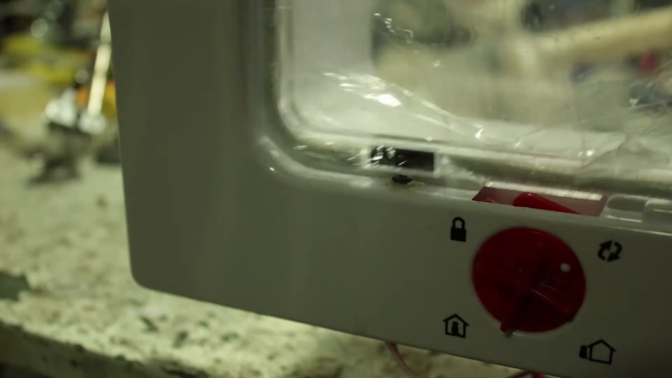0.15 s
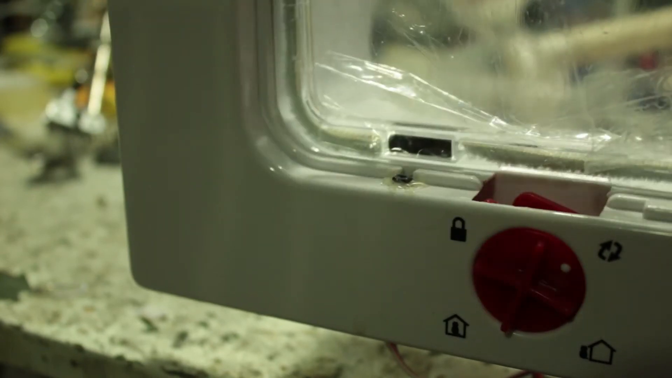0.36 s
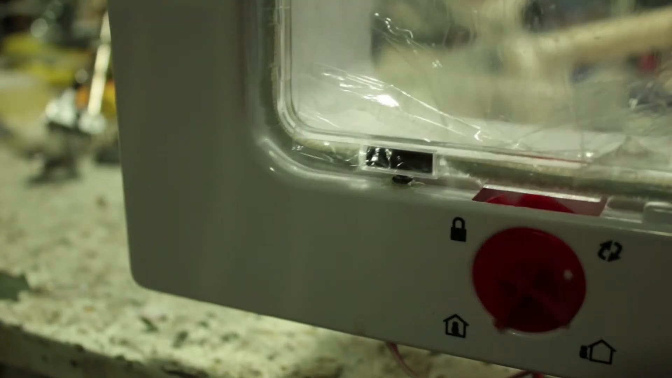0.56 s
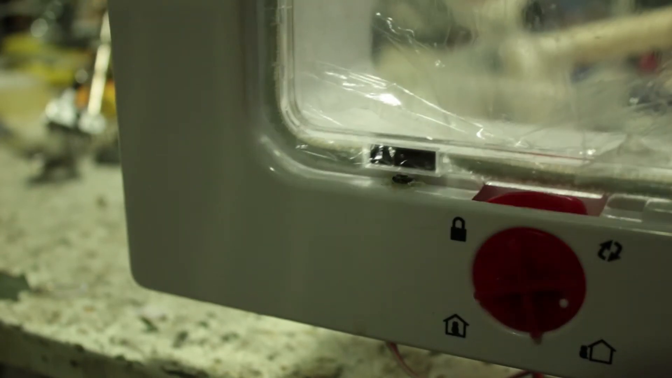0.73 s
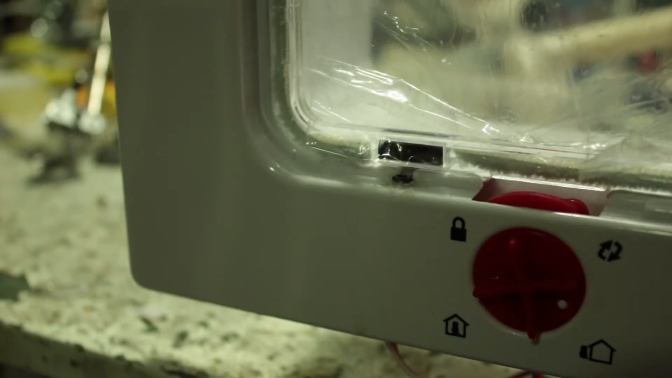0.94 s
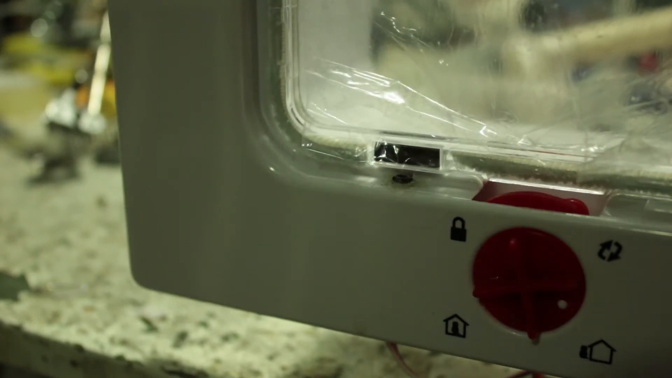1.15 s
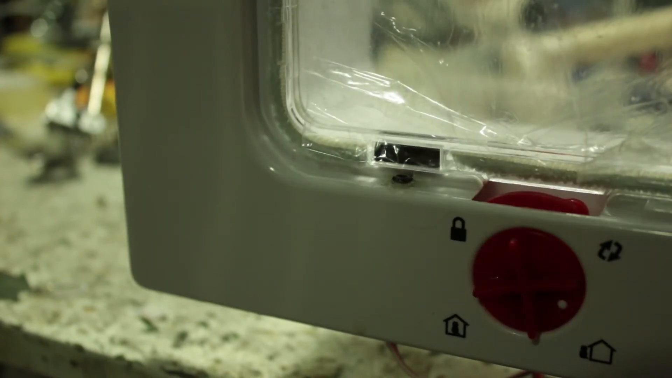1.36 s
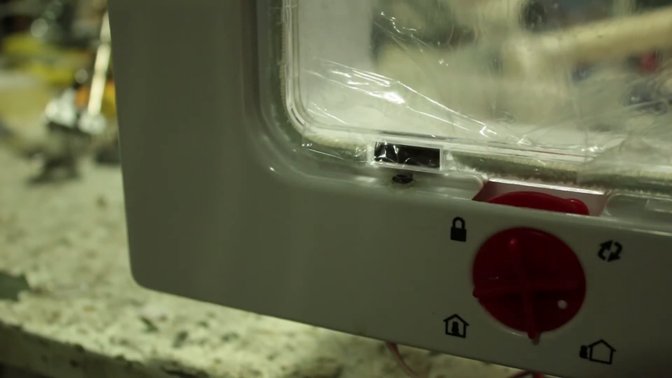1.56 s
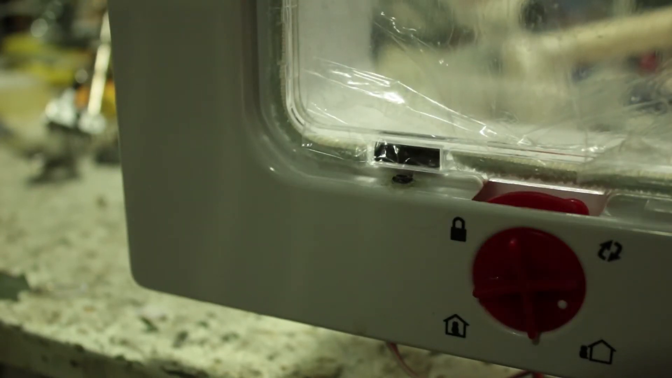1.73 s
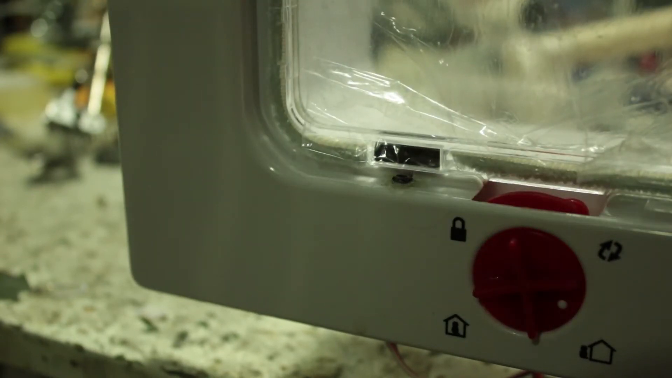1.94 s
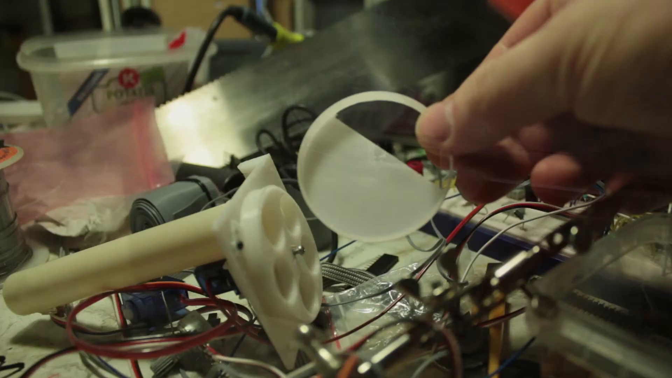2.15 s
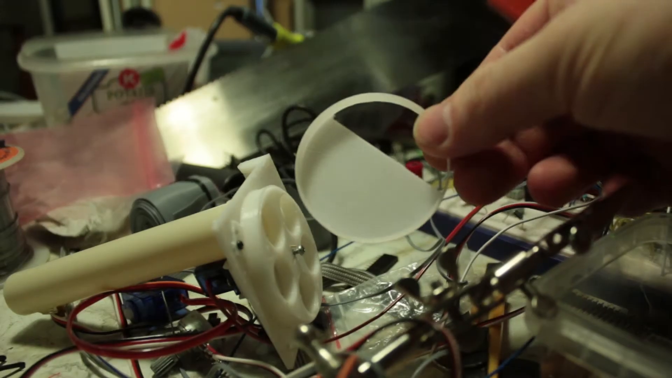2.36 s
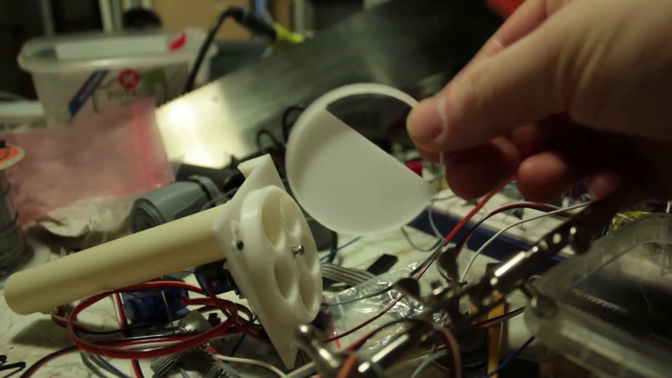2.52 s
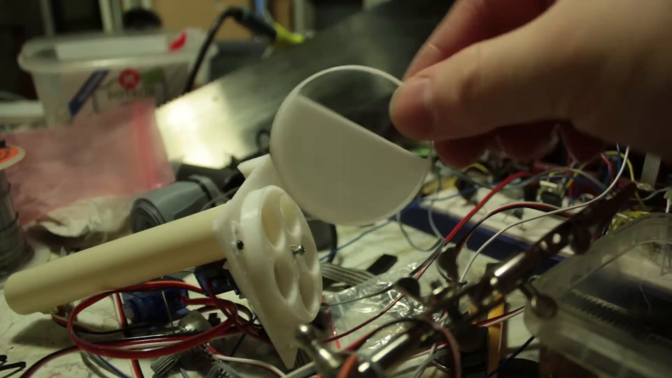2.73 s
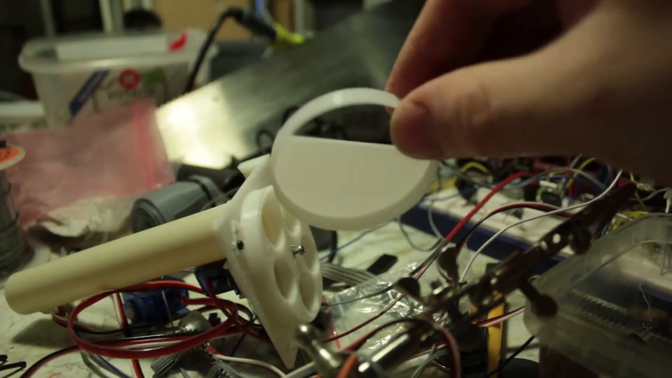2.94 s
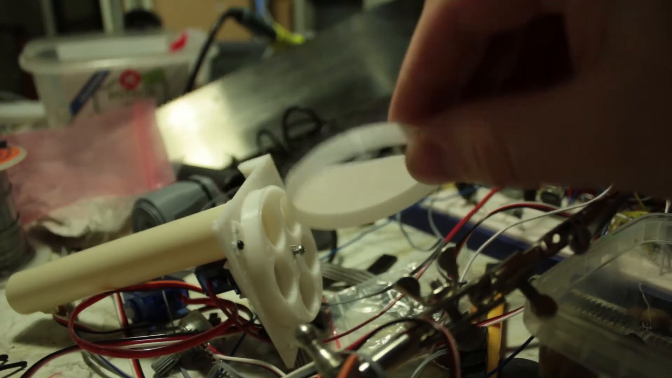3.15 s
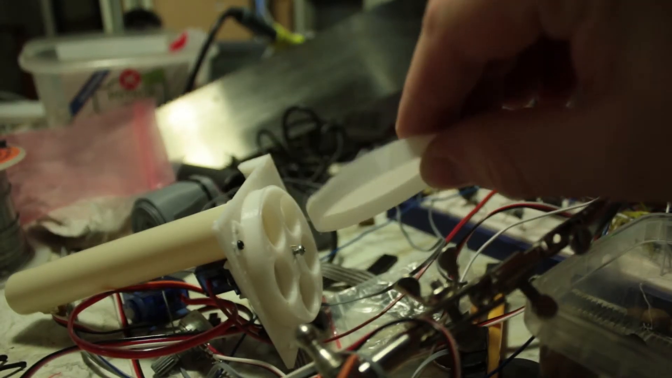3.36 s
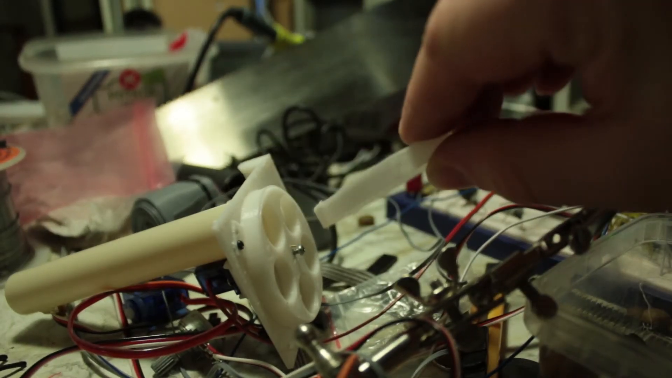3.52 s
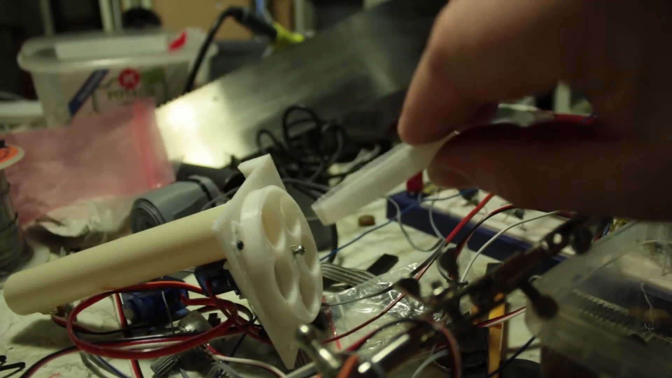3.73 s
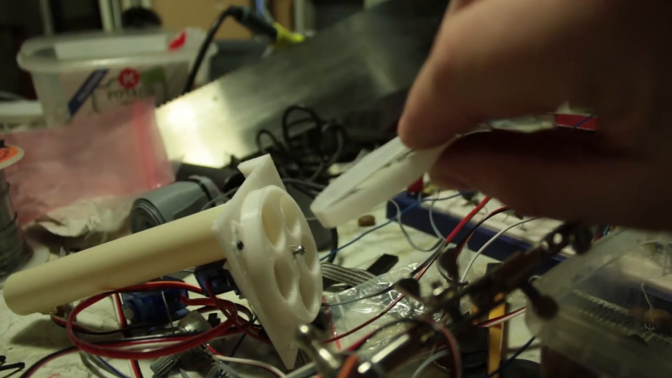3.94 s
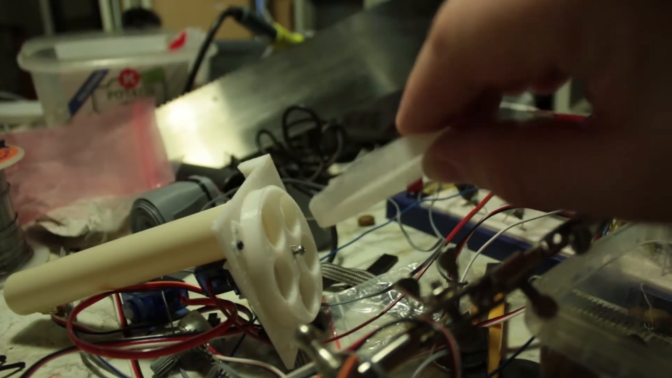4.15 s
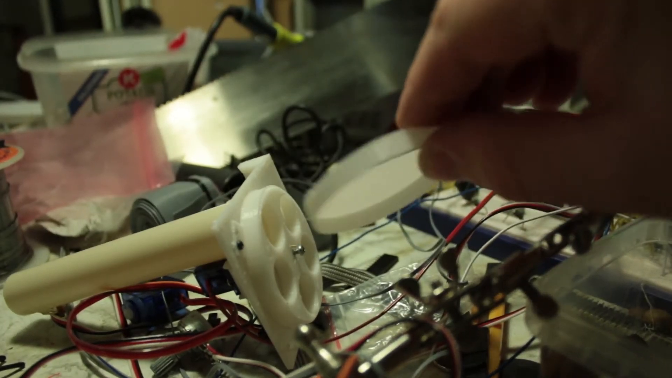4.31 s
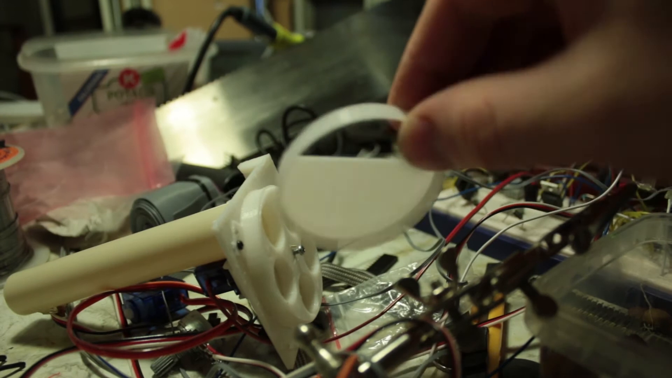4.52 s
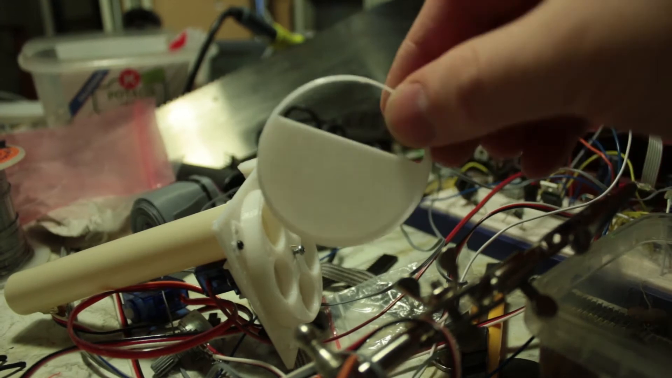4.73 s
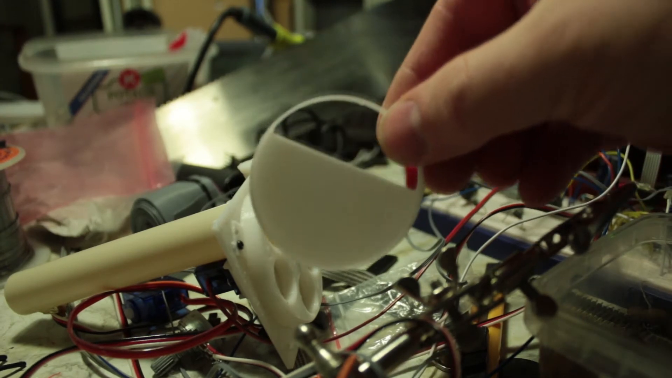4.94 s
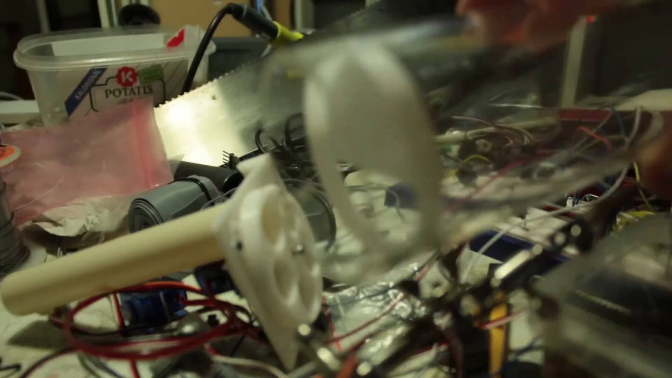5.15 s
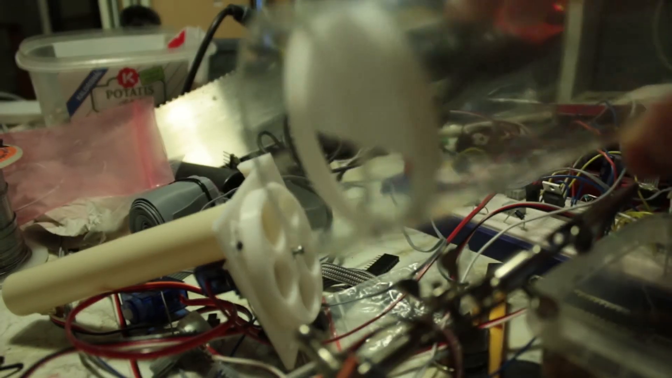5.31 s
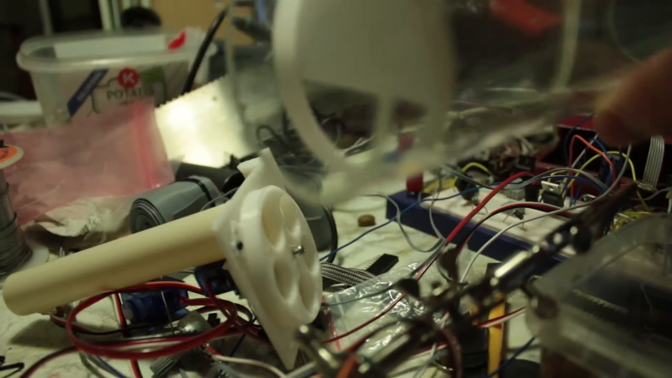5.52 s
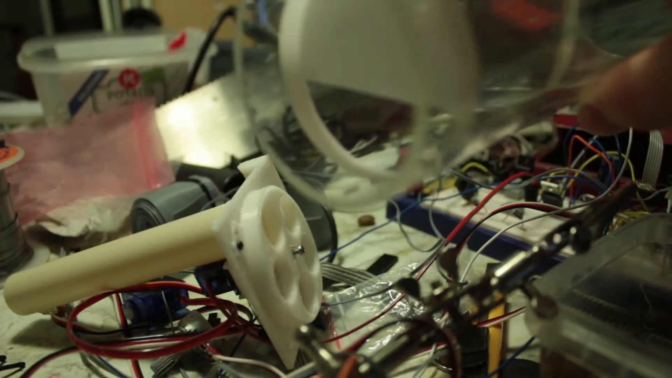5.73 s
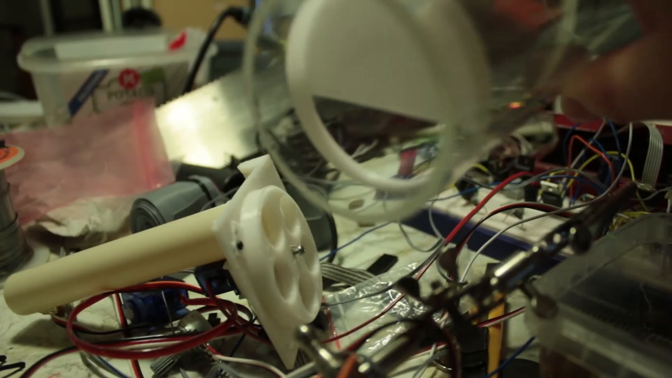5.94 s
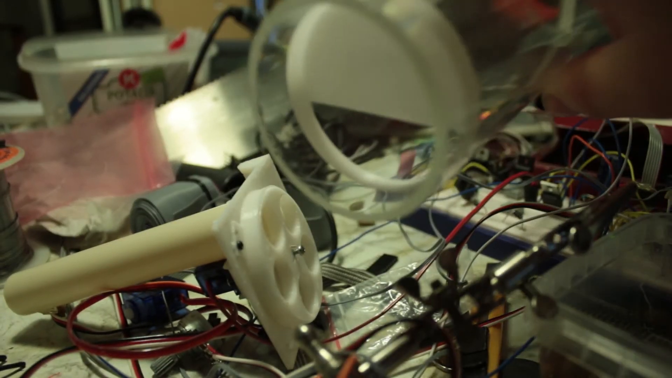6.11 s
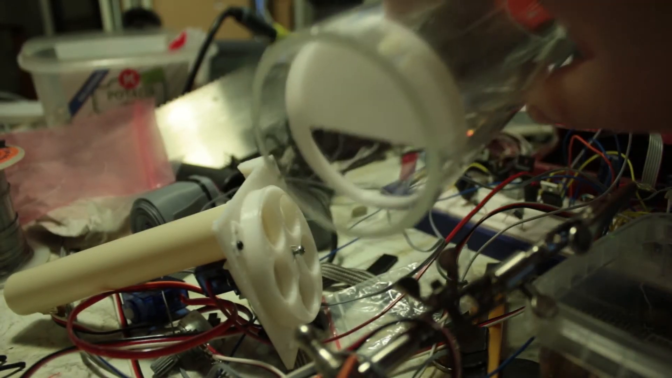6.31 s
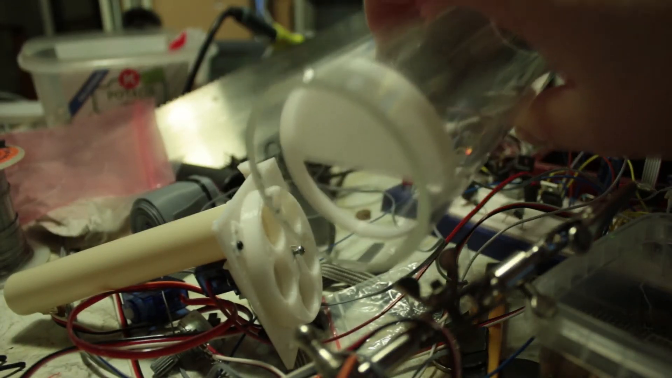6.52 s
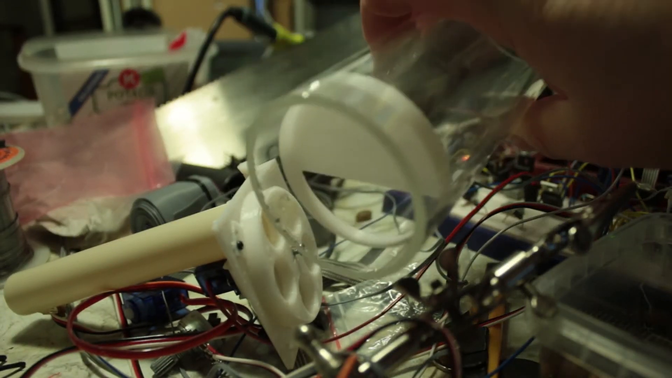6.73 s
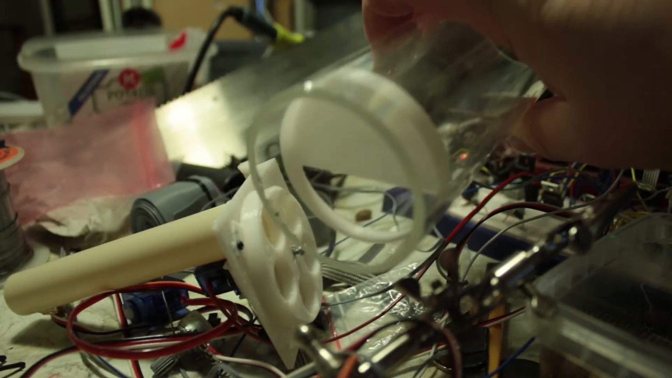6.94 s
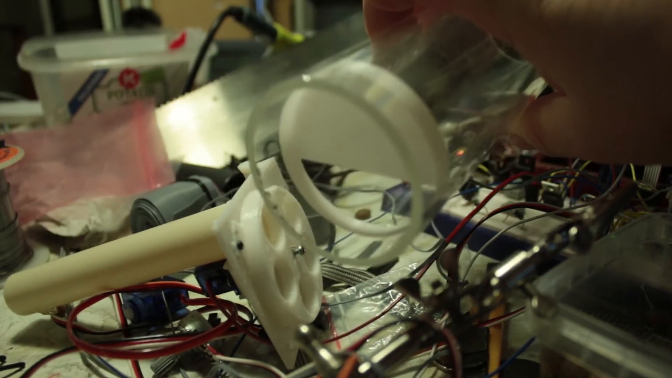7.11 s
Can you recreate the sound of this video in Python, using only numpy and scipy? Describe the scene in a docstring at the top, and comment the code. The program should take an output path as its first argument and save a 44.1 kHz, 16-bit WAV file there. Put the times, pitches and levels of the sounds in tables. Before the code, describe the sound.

Two brief raspy gear-motor zips and a sharp latch snap, a soft hiss of noise, then frequent small plastic scrapes, ticks and dull knocks.

```python
"""On a workbench in a small room, a small servo drives a plastic latch out and back in two short strokes. Its
gears whine as summed partials and rasp as filtered friction; the latch grinds on its frame, snaps and knocks. A
noise swish follows near two seconds, as a throbbing hum that runs from the start stops short. Light plastic
parts scuff and tick, mostly after that and often several times a second: bursts of tiny slips ring plastic
modes, the support thuds and the bench booms, over a faint noise floor and wavering hums."""
import sys
import numpy as np
from scipy import signal
from scipy.fft import rfft, irfft
from scipy.io import wavfile
from scipy.ndimage import uniform_filter1d

SR = 44100
rng = np.random.default_rng(int(sys.argv[2]) if len(sys.argv) > 2 else 0)


def master_out(mix):
    """Clip the mix to full scale and print it as 16-bit PCM to the path in sys.argv[1]."""
    frames = np.transpose(np.atleast_2d(mix))
    ceiling = np.clip(frames, -1, 1)
    pcm = np.round(ceiling * 32767).astype(np.int16)
    wavfile.write(sys.argv[1], SR, pcm)


N = 320594
T = np.arange(N) / SR  # time in seconds
HZ = np.fft.rfftfreq(N, 1 / SR)

# Scuffs of plastic on plastic. Each row: start in seconds, rise to the hardest rub in seconds,
# strength in dB ahead of the ring and body trims.
SCUFFS = [(.214, .022, -43.5), (0.385, .019, -56.5), (.92, 0.011, -47), (2.221, 0.03, -39),
          (2.349, 0.028, -42.5), (2.483, 0.023, -40), (2.649, .021, -49.5), (2.762, 0.026, -50),
          (2.928, 0.031, -50.5), (3.062, .023, -40.5), (3.178, 0.03, -43), (3.305, .03, -28.5),
          (3.473, 0.017, -35.5), (3.599, 0.016, -31.5), (3.678, .021, -29.5), (3.817, 0.028, -39.5),
          (3.976, 0.019, -36.5), (4.107, 0.024, -43.5), (4.228, 0.019, -33), (4.39, 0.018, -32.5),
          (4.557, 0.028, -46), (4.682, 0.026, -41), (4.808, 0.0274, -51), (5.222, 0.031, -29.5),
          (5.309, 0.021, -33), (5.446, 0.0212, -33), (5.603, 0.021, -33.5), (5.768, 0.017, -36),
          (5.892, 0.018, -36), (6.024, 0.02, -47), (6.808, 0.019, -35), (6.951, 0.015, -49.5),
          (7.073, 0.021, -47.5), (7.191, 0.025, -49)]


def amp(db):
    """Decibels to gain."""
    return 10 ** (np.asarray(db) / 20)


def evened(x):
    """Scales to rms 1."""
    return x / np.sqrt(np.mean(x ** 2) + 1e-20)


def read(points, hz):
    """Reads a table on a log-frequency axis."""
    f, value = np.transpose(points)
    return np.interp(np.log(hz + 1), np.log(f + 1), value)


def add(mix, s, sound):
    """Mixes a sound in at a time in seconds."""
    part = mix[..., max(round(s * SR), 0):][..., :sound.shape[-1]]
    part += sound[..., :part.shape[-1]]


def held(start, stop, attack_s, fall_db_per_s):
    """Swells to full gain at start, holds until stop, then dies away."""
    swell = np.clip(1 + (T - start) / attack_s, 0, 1) ** 2
    fall_db = -fall_db_per_s * np.maximum(T - stop, 0)
    return swell * amp(np.maximum(fall_db, -200))


def wander(rate_hz):
    """Random drift of rms 1, mostly slower than the given rate."""
    spectrum = rfft(rng.standard_normal(N))
    return evened(irfft(spectrum / (1 + (HZ / rate_hz) ** 4), N))


def colour(x, points):
    """Causal minimum-phase filter of unit energy with the given spectrum."""
    level_db = read(points, abs(np.fft.fftfreq(4096, 1 / SR)))
    log_gain = np.log(amp(np.maximum(level_db, -100)))
    taps = np.fft.ifft(np.exp(np.conj(signal.hilbert(log_gain)))).real[:2048]
    return signal.oaconvolve(x, taps[None] / np.linalg.norm(taps), axes=1)[:, :N]


def slips(per_s):
    """Friction as random tiny slips of uneven size, with signs drawn apart for mid and side."""
    size_db = 2 * np.minimum(rng.exponential(1, N), 3)
    size = amp(size_db) * (rng.random(N) < per_s / SR)
    return evened(size * rng.choice([-1., 1.], (2, N)))


def room(x, wet_db):
    """Adds dense random reflections, each band dying at its own speed."""
    # Decay of the small room. Each row: frequency in Hz, t60 in seconds.
    decay = [(100, 0.21), (400, 0.37), (2000, 0.27), (5000, 0.28), (9000, 0.16), (16000, 0.16)]
    taps = rng.standard_normal((2, SR // 2)) * (rng.random((2, SR // 2)) < .1)
    hz, t, z = signal.stft(taps, SR, nperseg=256)
    fall = amp(-60 * t / read(decay, hz)[:, None]) * (t > .003)
    tail = signal.istft(z * fall, SR, nperseg=256)[1]
    wet = signal.oaconvolve(x, tail / np.linalg.norm(tail[0]), axes=1)[:, :N]
    return (x + amp(wet_db) * wet) / np.sqrt(1 + amp(wet_db) ** 2)


def microphones(x):
    """Mid and side at two spaced capsules: alike in the bass, partly opposed near 5 kHz, unrelated above."""
    # Likeness of the two sides. Each row: frequency in Hz, left-right correlation.
    likeness = [(30, 0.76), (600, 0.69), (1200, 0.4), (2200, 0.16), (3500, -0.15), (4500, -0.2),
                (6000, -0.17), (9000, -0.0042), (16000, -0.041)]
    # Tilt between the sides. Each row: frequency in Hz, left minus right in dB.
    balance = [(100, 0), (2000, -.4), (5000, -1), (12000, -2.2)]
    same = np.clip(read(likeness, HZ), -.99, .99)
    mid, side = rfft(x)
    mid = mid * np.sqrt((1 + same) / 2)
    side = side * np.sqrt((1 - same) / 2)
    lean = amp(read(balance, HZ) / 2)
    return irfft(np.array([(mid + side) * lean, (mid - side) / lean]), N)


def background(floor_db=-56.5):
    """Room air and microphone hiss as coloured noise, with faint wavering sine hums."""
    # Colour of the noise floor. Each row: frequency in Hz, relative level in dB.
    floor_colour = [(20, -5), (50, -18), (90, -6.5), (125, -2.5), (160, -0.5), (240, -3.5), (440, -6),
                    (600, -6), (1000, -10.5), (2200, -15), (5600, -16.5), (10000, -21.5), (16000, -26)]
    # Hums of the workshop. Each row: start in seconds, end in seconds, pitch in Hz, level in dB,
    # unsteadiness as a share of the tone.
    hums = [(0, 7.5, 48.4, -73.5, .05), (0, 7.5, 121, -82, .3), (2.15, 7.5, 234, -71, 0.5),
            (2.15, 6.7, 286, -71, 0.32)]
    out = amp(floor_db) * colour(rng.standard_normal((2, N)), floor_colour)
    for start, stop, hz, db, unsteady in hums:
        on = uniform_filter1d(1. * ((T >= start) & (T < stop)), size=2000)
        waver = 1 + unsteady * (wander(16.0) + 1j * wander(14.0))  # level and phase
        tone = waver * np.exp(2j * np.pi * hz * T)
        out[0] += amp(db) * on * evened(tone.real)
    return out


def throbbing_hum(hz=531, lift_hz=34, base_db=-71, swell_db=13):
    """A distant machine whose tone swells and lifts in pitch once in every turn."""
    turn_s, peak_at_s, end_s = .115, 1.04, 2.12
    swell = np.exp(2 * (np.cos(2 * np.pi * (T - peak_at_s) / turn_s) - 1))
    tone = np.sqrt(2) * np.sin(2 * np.pi * np.cumsum(hz + lift_hz * swell) / SR)
    on = np.clip((end_s - T) / 0.037, 0, 1)
    return np.array([amp(base_db + swell_db * swell) * tone * on, np.zeros(N)])


def bench(follow=0.31, rise_s=0.024):
    """Low modes that build up slowly from each hardest rub, a little louder for harder scuffs."""
    # Boom of the bench. Each row: frequency in Hz, level in dB for a scuff of mean strength, t60 in seconds.
    bench_modes = [(75.4, -56.5, 0.54), (190, -58, 0.85)]
    out, t = np.zeros((2, N)), np.arange(SR // 2) / SR
    usual_db = np.mean([row[2] for row in SCUFFS])
    for s, delay, rub_db in SCUFFS:
        boom = sum(amp(db - 60 * t / t60) * np.sin(2 * np.pi * (hz * t + rng.random()))
                   for hz, db, t60 in bench_modes)
        gain = amp(follow * (rub_db - usual_db))
        add(out[0], s + delay, gain * boom * (1 - np.exp(-t / rise_s)))
    return out


def swish(full_from_s=1.992, full_to_s=2.052, level_db=-43.5, rise_s=0.058, fall_db_per_s=240):
    """A smooth hiss of coloured noise that swells and fades."""
    # Colour of the hiss. Each row: frequency in Hz, relative level in dB.
    swish_colour = [(410, -45.5), (700, -18), (921, -16), (1840, -5.5), (2270, -4.5), (4550, -2.5),
                    (4860, -5.5), (5390, -4), (9350, -7.5), (16000, -19)]
    level = amp(level_db) * held(full_from_s, full_to_s, rise_s, fall_db_per_s)
    return level * colour(rng.standard_normal((2, N)), swish_colour)


def scuffs(tick_s=0.0035, tick_fizz_db=-3, thud_lag_s=0.014, thud_s=0.012, ring_db=-3.0, body_db=-4.0,
           release=1.08, rebound_s=0.0393, rebound_db=-13, rebound_length_s=0.0024, spot_db=0.5,
           detune=0.014, judder_db=0.9, contact_s=0.004):
    """A touch may tick, the rub swells and dies in ringing plastic, the support thuds, the part brushes again."""
    # Ticks, where the parts meet edge on. Each row: time in seconds, level in dB ahead of the trims.
    edge_ticks = [(2.763, -42), (3.306, -35.5), (3.476, -36), (3.6, -37), (3.976, -40), (4.229, -39),
                  (4.39, -39.5), (4.556, -39), (4.808, -46), (5.224, -33.5), (5.769, -35), (5.896, -35),
                  (6.807, -35)]
    # Colours of the plastic body, the fizz and the thud. Each row: frequency in Hz, relative level in dB.
    plastic_colour = [(290, -69), (500, -36.5), (759, -14), (883, -21), (980, -10.5), (1520, -20),
                      (1830, -6), (2570, -12.5), (2850, 2.5), (3160, -5), (3390, -12), (3990, -15),
                      (4280, -21), (8000, -30.5), (10400, -20.5), (17600, -120)]
    fizz_colour = [(3500, -8), (4500, 6.5), (5800, -0.5), (7000, 1), (8800, -5), (10500, 1), (13000, -2.5),
                   (14500, -32), (16000, -31)]
    thud_colour = [(50, -16), (80, -15), (120, -8.5), (200, -1.5), (350, -8), (600, -13), (1200, -12),
                   (2500, -34)]
    # Ring of the plastic. Each row: frequency in Hz, relative level in dB, t60 in seconds ahead of the cap.
    plastic_modes = [(2205, -2.5, 0.004), (2460, -11.5, 0.011), (2856, -16, 0.019), (2942, -1.5, 0.008),
                     (3160, -7, 0.035), (3140, -6.5, 0.036)]
    longest_ring_s = .025  # cap on every t60
    # a firm scuff: its strength, the time scale of its swell, and its fizz and thud levels
    firm_db, firm_length_s, firm_fizz_db, firm_thud_db = -31, 0.0085, -44.5, -49
    # harder ones last longer, fizz much more and thud a little more: growth in dB per dB of strength
    length_growth, fizz_growth, thud_growth = 0.17, 1.55, 0.66

    rub, fizz, thud, ticks = np.zeros((4, N))
    rung, t = np.zeros((2, N)), np.arange(SR // 6) / SR
    grain = slips(per_s=3400)
    judder = amp(judder_db * wander(156))  # the parts stick and slip as they rub
    for s, db in edge_ticks:
        add(ticks, s, amp(db) * np.exp(-t / tick_s))
    for s, rise_s, rub_db in SCUFFS:
        harder_db = rub_db - firm_db
        now = (round(s * SR) + np.arange(len(t))) % N
        past = (t - rise_s) / (firm_length_s * amp(length_growth * harder_db))
        steepness = np.where(past > 0, release, 1)
        hump = 1 / np.sqrt(np.cosh(np.minimum(abs(past) * steepness, 40)))
        swell = np.minimum(t / contact_s, 1) * judder[now] * hump
        rebound = amp(rebound_db) * np.exp(-((t - rise_s - rebound_s) / rebound_length_s) ** 2)
        touch = ticks[now] * (t < rise_s)
        force = np.hypot(amp(rub_db) * np.hypot(swell, rebound), touch)
        add(rub, s, force)
        rub_fizz = amp(firm_fizz_db + fizz_growth * harder_db) * swell
        add(fizz, s, np.hypot(rub_fizz, amp(tick_fizz_db) * touch))
        thud_gain = amp(firm_thud_db + thud_growth * harder_db)
        add(thud, s, thud_gain / np.cosh((t - rise_s - thud_lag_s) / thud_s))
        # each spot of contact shifts the modes together and shares the same energy differently among them
        shift = 1 + detune * rng.standard_normal()
        ring = 0
        for hz, db, t60 in plastic_modes:
            fall_db = 60 * t / min(t60, longest_ring_s)
            gain = amp(db + spot_db * rng.standard_normal() - fall_db)
            ring = ring + gain * np.sin(2 * np.pi * (shift * hz * t + rng.random((2, 1))))
        sound = signal.fftconvolve(grain[:, now] * force, ring, axes=1)
        add(rung, s, sound * np.linalg.norm(force) / np.linalg.norm(sound, axis=1, keepdims=True))
    low = colour(thud * rng.standard_normal((2, N)), thud_colour)
    body = colour(slips(per_s=3000) * rub, plastic_colour)
    return amp(ring_db) * rung + amp(body_db) * body + colour(grain * fizz, fizz_colour) + low


def knocks(blows, modes, rattle=0.35):
    """Blows ring low modes, centred, each in a diffuse noise smear; hard blows favour the upper modes."""
    out, t = np.zeros((2, N)), np.arange(SR // 3) / SR
    for s, blow_db, hardness in blows:
        for k, (hz, db, t60) in enumerate(modes):
            band = signal.butter(3, [hz * .7, hz * 1.5], "band", fs=SR, output="sos")
            tilt_db = hardness * np.log2(hz / modes[0][0])
            onset = (1 - np.exp(-2 * t * hz)) ** 2
            fall = amp(blow_db + db + tilt_db - 60 * t / t60) * onset
            smear = evened(signal.sosfilt(band, rng.standard_normal((2, len(t)))))
            add(out, s, fall * rattle * smear)
            add(out[0], s, (-1) ** k * fall * np.sin(2 * np.pi * hz * t))
    return out


def snaps(rise_s=0.0012):
    """The latch catches once on its way, then snaps home: dense bright slips that die away."""
    # Snaps of the latch. Each row: time in seconds, level in dB ahead of the rise, t60 in seconds.
    latch_snaps = [(.74, -17.5, 0.073), (0.788, -12, 0.064)]
    # Colour of the rattle. Each row: frequency in Hz, relative level in dB.
    snap_colour = [(300, -33), (1200, -6.5), (2700, 3.5), (4000, 4.5), (6000, 6), (9000, -3), (13000, 4.5),
                   (15000, -6), (16000, -17)]
    force, t = np.zeros(N), np.arange(SR // 5) / SR
    for s, db, t60 in latch_snaps:
        add(force, s, amp(db - 60 * t / t60) * (1 - np.exp(-t / rise_s)))
    return colour(force * slips(per_s=16000), snap_colour)


def servo(jitter=0.022, flutter=0.16, chatter_db=1.0, wobble=0.41, idler_db=-12):
    """Gear teeth sing at the mesh rate and rasp in their case; the latch grinds; load smothers the whine."""
    # The two powered strokes, a list each. Each row: time in seconds, gear mesh rate in Hz, effort in dB.
    strokes = [
        [(0, 2157, 2.5), (.012, 2007, -5.5), (.028, 2014, -2.5), (.034, 2223, -0.5), (.052, 2620, -1),
         (.1, 2386, -3), (.12, 2400, -2)],
        [(.588, 2473, -2.5), (.622, 2886, 2), (.645, 2870, -2.5), (.655, 2520, 1.5), (.669, 2030, -6),
         (.676, 2504, -6.5), (.698, 2470, -4), (.73, 2600, 0), (.775, 2500, -14), (.8, 2190, -5.5)],
    ]
    # Partials of the whine. Each row: multiple of the mesh rate, relative level in dB.
    partials = [(1, -13), (2, 0), (3, -12), (4, -22), (5, -18)]
    # Colours of the gear case and of the latch on its frame. Each row: frequency in Hz, relative level in dB.
    rasp_colour = [(300, -30), (1700, -23), (2100, -18.5), (3200, -10), (4000, -8), (5000, -5),
                   (5800, -3.5), (7300, -9.5), (8400, -9.5), (10400, -13.5), (14500, -16), (16000, -21)]
    grind_colour = [(71, -47.5), (120, -39), (385, -6.5), (473, -19.5), (684, -7), (805, -13), (1160, -4.5),
                    (1400, -5), (3110, 1.5), (4140, -10.5), (5630, -2), (12800, -9), (16000, -12)]
    # The latch drags on its frame. Each row: start in seconds, end in seconds, level in dB.
    drags = [(0.06, 0.092, -26.5), (0.583, 0.591, -28.5), (0.723, 0.806, -25)]
    # The gear teeth bite and the whine flares. Each row: time in seconds, lift in dB.
    bites = [(0.035, 2), (0.042, 3.5), (0.642, 6.5), (.646, 5), (0.655, 2.5)]
    bite_s = 0.0027
    rasp_db, whine_db_at_rest = -23, -21.8  # at an effort of 0 dB
    spin_up_s, coast_db_per_s = .027, 360
    loaded_from_s, whine_fade_db_per_s = [.032, .682], 300  # the whine fades once the gears take the load
    case_hz, case_width_hz, case_db = 2930, 41, -8  # the case rings when the whine passes this pitch
    drag_grip_s, drag_release_db_per_s = 0.023, 450
    shaft_teeth, idler_ratio = 11, 1.21

    rasp = colour(slips(per_s=9200), rasp_colour) * amp(chatter_db * wander(240))
    grind = colour(slips(per_s=9000), grind_colour)
    sway = 1 + jitter * wander(390)  # of the pitch
    flicker = 1 + flutter * wander(380)  # of the level
    lag = np.array([[0], [np.pi / 2]])  # side trails mid: the whine reaches the right capsule first
    bite_db = sum(db / (1 + ((T - s) / bite_s) ** 4) for s, db in bites)
    case = signal.iirpeak(case_hz, case_hz / case_width_hz, fs=SR)
    out = grind * sum(amp(db) * held(start, stop, drag_grip_s, drag_release_db_per_s)
                      for start, stop, db in drags)
    for rows, loaded_s in zip(strokes, loaded_from_s):
        s, hz, effort_db = np.transpose(rows)
        power = amp(np.interp(T, s, effort_db)) * held(s[0], s[-1], spin_up_s, coast_db_per_s)
        on = power > 1e-4
        meshes = np.cumsum(np.interp(T[on], s, hz) * sway[on]) / SR  # teeth passed so far
        pinion = sum(amp(db) * np.cos(2 * np.pi * k * meshes - lag) for k, db in partials)
        idler = amp(idler_db) * np.cos(2 * np.pi * idler_ratio * meshes - lag) * wander(100)[on]
        # the pinion runs off centre and presses harder once a turn
        press = 1 + wobble * np.cos(2 * np.pi * meshes / shaft_teeth)
        fade_db = whine_fade_db_per_s * np.maximum(T[on] - loaded_s, 0)
        whine_db = whine_db_at_rest + bite_db[on] - fade_db
        whine = amp(whine_db) * evened((pinion + idler) * press) * flicker[on]
        whine = whine + amp(case_db) * signal.lfilter(*case, whine)
        out[:, on] += power[on] * (whine + amp(rasp_db) * rasp[:, on])
    return out


def scene():
    """Everything on the bench, in the room, at the two capsules."""
    # Dull knocks of the frame, then a hollow plastic part that is bumped and settles.
    # Each row: time in seconds, level in dB, hardness in dB per octave above the lowest mode.
    frame_knocks = [(.001, -40.5, 6), (.07, -41.5, -17), (.544, -38.5, 7.5), (.554, -44.5, 7),
                    (.812, -35, -4), (4.41, -32, -4), (5.243, -31.5, -4), (5.272, -45, -3)]
    hollow_bumps = [(5.138, -54, 5), (5.155, -43, -21)]
    # Modes of the frame and of the hollow part. Each row: frequency in Hz, relative level in dB, t60 in seconds.
    frame_modes = [(171.4, -2, 0.19), (266, -4, 0.066), (382, -5, 0.065), (469, -7.5, 0.064),
                   (692, -13, 0.038), (1100, -24.5, 0.044)]
    hollow_modes = [(316, 0.5, 0.084), (552, 5, 0.23), (656, 9.5, .06), (1866, -12.5, 0.21)]
    blows = knocks(frame_knocks, frame_modes) + knocks(hollow_bumps, hollow_modes)
    near = room(servo() + snaps(), wet_db=-9.0)
    near = near + room(blows, wet_db=-8.5)
    near = near + room(scuffs(), wet_db=-24.5)
    return microphones(near + bench() + swish() + throbbing_hum() + background())


def record(dry, edge_hz=15900):
    """The recorder's band limit: a steep low-pass."""
    taps = signal.firwin(511, edge_hz, window=("kaiser", 9), fs=SR)
    return signal.oaconvolve(dry, taps[None], "same")


dry = scene()
out = record(dry)
master_out(out)
```